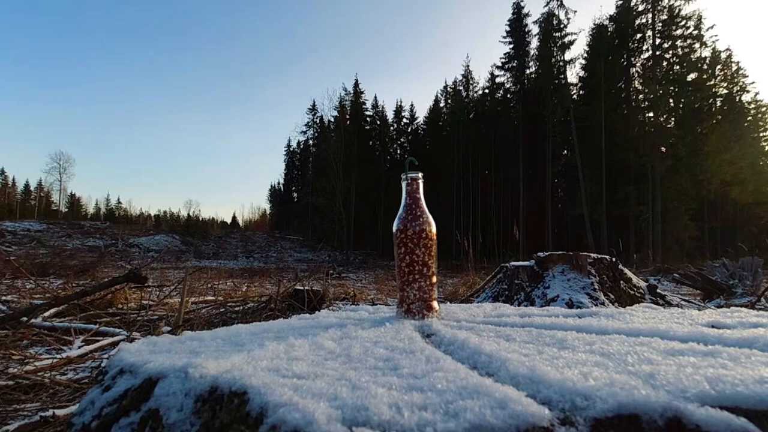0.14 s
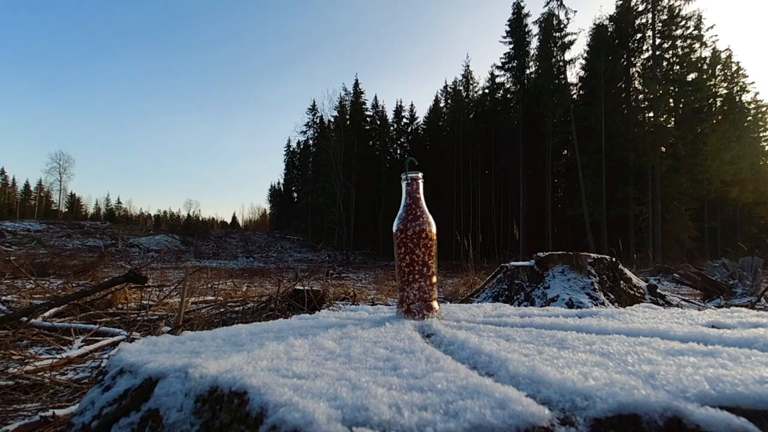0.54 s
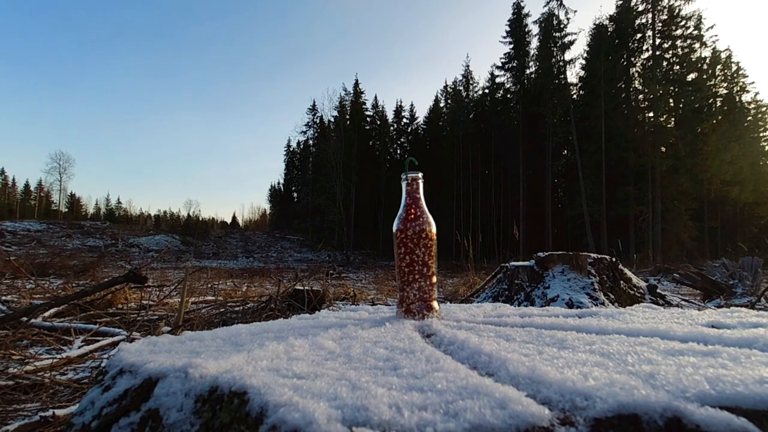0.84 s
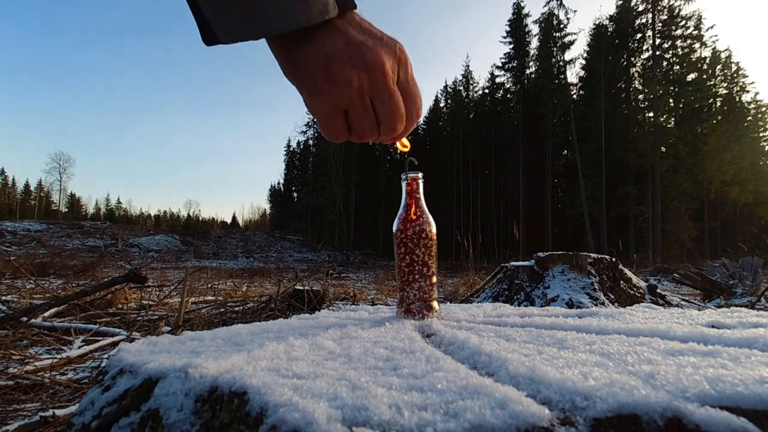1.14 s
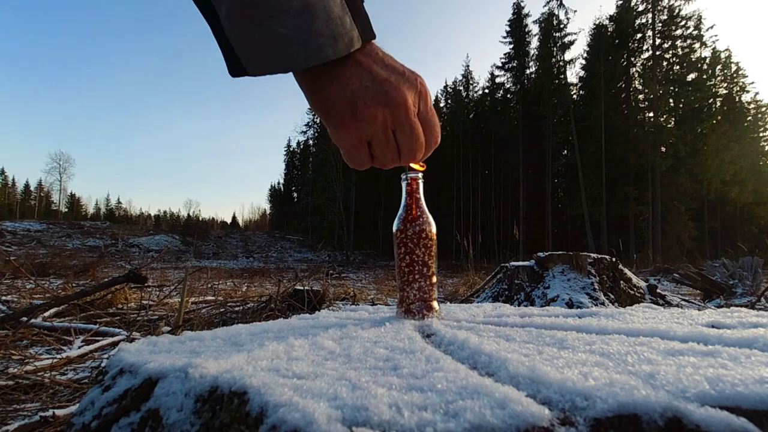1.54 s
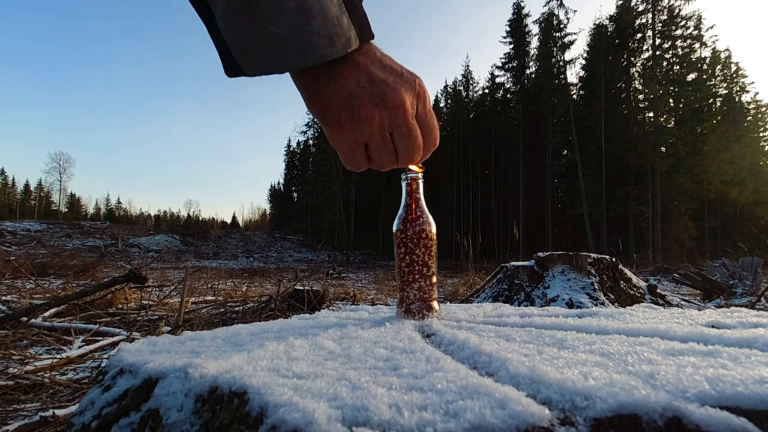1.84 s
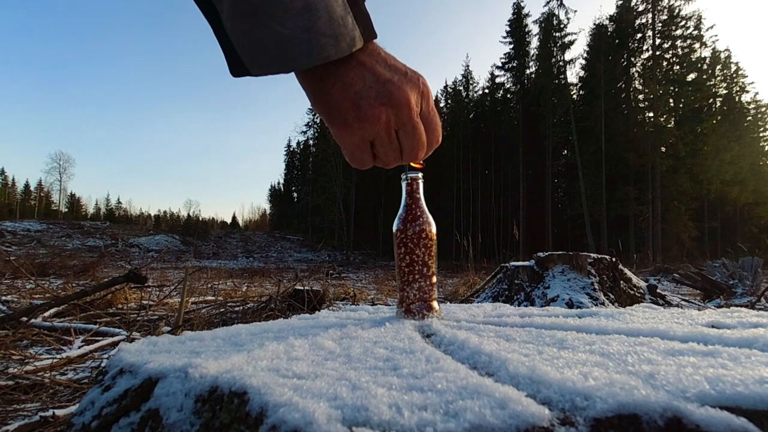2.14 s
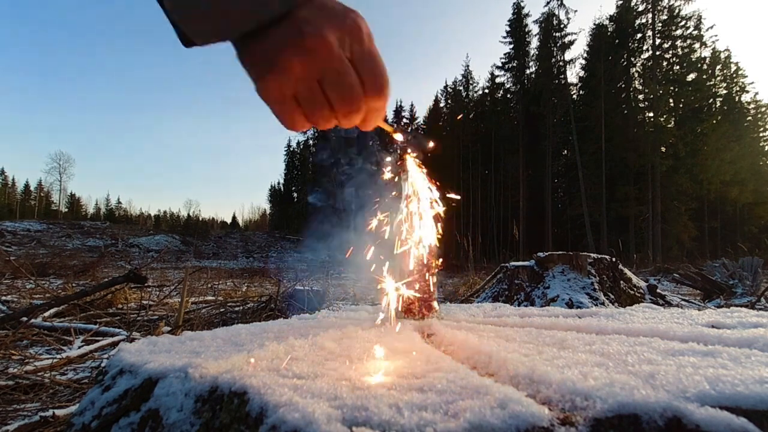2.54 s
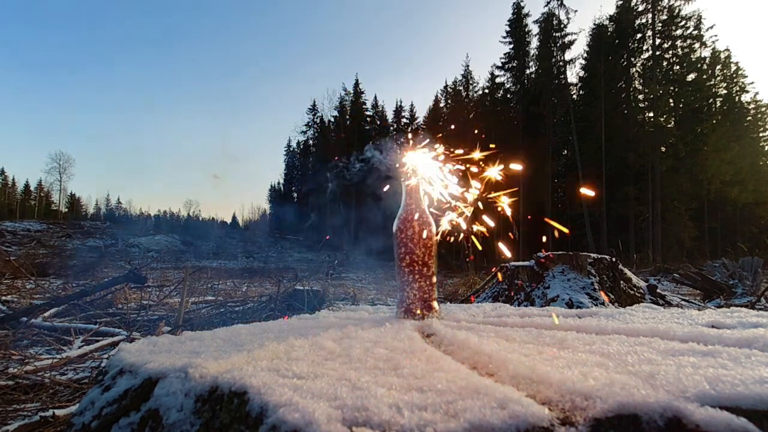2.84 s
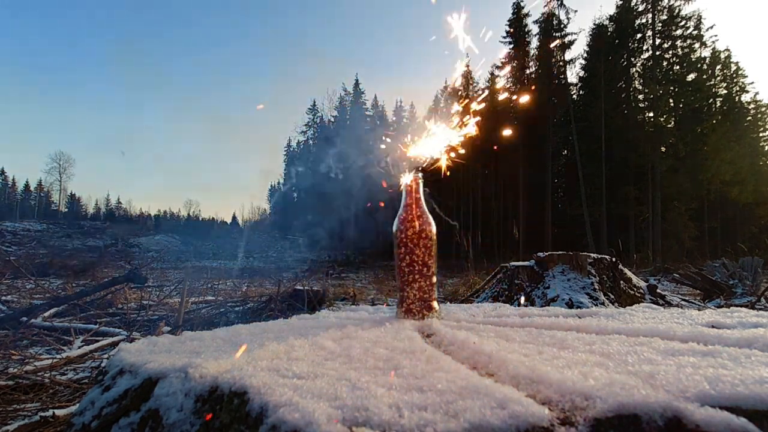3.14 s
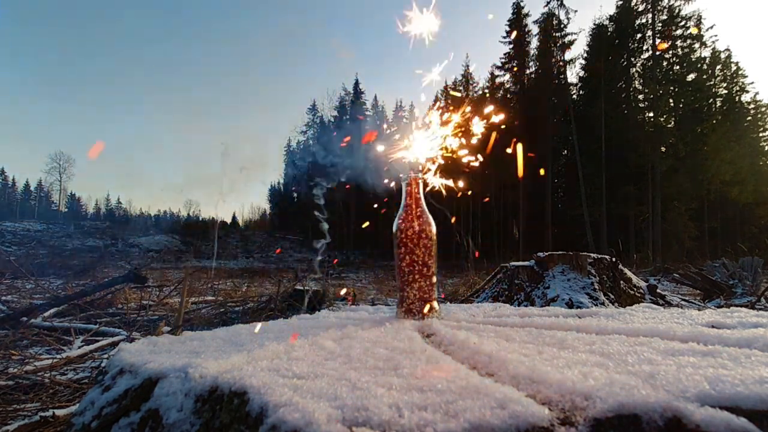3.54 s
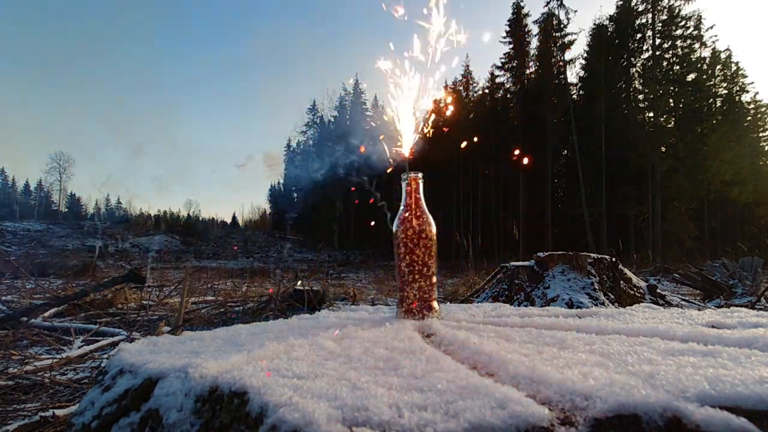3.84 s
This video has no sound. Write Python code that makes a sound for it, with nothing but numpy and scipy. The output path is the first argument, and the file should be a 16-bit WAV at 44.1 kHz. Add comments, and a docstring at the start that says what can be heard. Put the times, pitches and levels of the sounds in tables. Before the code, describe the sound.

Match heads ignite in a bottle with a loud roaring hiss. First, faint rustling at 0.2 s, a quick scratchy match strike near 0.35, then soft fizzing flame with snaps and pops, strongest around 0.9, fading by 1.2. Snow crunches on the right at 1.65; small pops near 2.0. From 2.35 the gas jet bursts out and roars to the end, crackling, with heavier pops at 3.1 and 3.8.

```python
"""Outdoors on a still winter day a match is struck, flares with small pops and is held to a glass bottle full of match heads.
Snow crunches once to the right, then the heads catch: gas roars and hisses out of the neck, thick with crackling sparks.
Scrape, flame, gas and air are coloured noise; pops are sinking tones, and sparks and the snow's crack are filtered clicks.
A soft drone from far away and a low rumble of air lie underneath, both made of steady noise."""
import sys
import numpy as np
from scipy import signal
from scipy.fft import rfft, irfft, next_fast_len
from scipy.io import wavfile
from scipy.ndimage import uniform_filter1d, map_coordinates

SR = 44100
rng = np.random.default_rng(int(sys.argv[2]) if len(sys.argv) > 2 else 0)


def dump(signal):
    """Clip the signal to [-1, 1] and save it as 16-bit WAV at the path in sys.argv[1]."""
    limited = np.clip(np.atleast_2d(signal).T, -1, 1)
    pcm = np.round(limited * 32767).astype(np.int16)
    wavfile.write(sys.argv[1], SR, pcm)


N = 176400  # samples: 4 s
TIME = np.arange(N) / SR
SIZE = 2 * next_fast_len(N // 2 + 4096)  # Fourier length, with room for filters to ring out
HZ = np.maximum(np.arange(SIZE // 2 + 1) * SR / SIZE, 1)

# loudness of the jet in four bands: time_s, roar_db, hiss_db, upper_hiss_db, sizzle_db
JET_LEVEL = [(2.28, -90, -90, -93, -100), (2.318, -61, -61, -66, -71.5), (2.332, -45, -44, -46, -48),
             (2.352, -45.5, -45.5, -45, -41), (2.372, -28.5, -30.5, -35, -30.5),
             (2.415, -27.5, -27, -32, -33), (2.45, -28, -29.5, -36, -34), (2.59, -30.5, -28.5, -34, -32.5),
             (2.648, -32, -26, -32.5, -24), (2.685, -30.5, -27.5, -34.5, -32),
             (2.775, -30, -27, -35.5, -32), (2.825, -32.5, -30, -37, -32.5), (2.87, -30.5, -27, -37, -34),
             (2.97, -30.5, -32, -43.5, -36.5), (3.06, -32, -32.5, -47, -36.5), (3.21, -29, -30.5, -43, -34),
             (3.3, -32, -33, -49, -37), (3.38, -31.5, -31.5, -43.5, -36), (3.56, -32.5, -30.5, -42, -35.5),
             (3.7, -33, -32.5, -47, -38), (3.91, -32, -31, -43, -37.5), (4.0, -34.5, -29, -39.5, -36.5)]
# part that differs between the two sides, for sounds straight ahead: pitch_hz, level_db
WIDTH_AHEAD = [(60, -20), (400, -21.5), (1200, -27), (2500, -25), (5000, -23), (6200, -29), (7800, -18),
               (15000, -14.5)]
# the same for sounds from the side: pitch_hz, level_db
WIDTH_ASIDE = [(60, -21.5), (400, -13), (1500, -10), (4000, -1), (9000, -2), (14000, -6.5)]


def from_db(db):
    """Decibels to gain."""
    return 10 ** (np.asarray(db) / 20)


def rms_one(x):
    """Scale to an average strength (rms) of 1."""
    return x / np.sqrt(np.mean(x ** 2) + 1e-20)


def gains(rows):
    """One gain curve for each dB column; silent before the first row."""
    times, *columns = np.transpose(rows)
    return [from_db(np.interp(TIME, times, db)) * (TIME >= times[0]) for db in columns]


def passing(rows):
    """Gain curves of a sound that stops at its last row."""
    return [gain * (TIME <= rows[-1][0]) for gain in gains(rows)]


def at_hz(points):
    """A table over log frequency, read at every frequency of the Fourier transform."""
    hz, value = np.transpose(points)
    return np.interp(np.log(HZ), np.log(hz), value)


def filtered(x, response):
    """Apply a frequency response."""
    return irfft(rfft(x, SIZE) * response, SIZE)[..., :N]


def low_pass(hz):
    """Response that keeps what lies below a frequency."""
    return 1 / (1 + (HZ / hz) ** 6)


def colour(x, points):
    """Filter with the given spectrum that never sounds ahead of its input (minimum phase)."""
    cepstrum = irfft(np.log(from_db(at_hz(points))), SIZE)
    # fold the mirrored half forward in time
    cepstrum[1:SIZE // 2] *= 2
    cepstrum[SIZE // 2 + 1:] = 0
    return filtered(x, np.exp(rfft(cepstrum)))


def resonance(x, hz, width_hz):
    """Ring at one pitch (two-pole resonance) with gain 1 on top; a narrow one rings longer."""
    radius = np.exp(-np.pi * width_hz / SR)
    top = np.array([1, 0, -1]) * (1 - radius ** 2) / 2
    bottom = [1, -2 * radius * np.cos(2 * np.pi * hz / SR), radius ** 2]
    return signal.lfilter(top, bottom, x + 1e-18)


def drift(rate_hz):
    """Slow random wandering with spread 1."""
    return rms_one(filtered(rng.standard_normal(N), 1 / (1 + (HZ / rate_hz) ** 2)))


def clicks(per_s, spread_db):
    """Clicks at random moments; a larger spread makes a few stand out more."""
    sizes = from_db(spread_db * np.minimum(rng.exponential(1, N), 4.5))
    happens = rng.random(N) < per_s / SR
    return sizes * rng.choice([-1, 1], N) * happens


def widen(mid, width):
    """Trade some of the shared sound for a part that is unlike on the two sides."""
    side = from_db(at_hz(width))
    unlike = filtered(rng.standard_normal(N), side) * np.array([[1], [-1]])
    return filtered(mid + unlike, 1 / np.sqrt(1 + side ** 2))


def grainy(per_s, spread_db, share, width):
    """Stereo raw noise: dense clicks (their share of the power) mixed with smooth turbulence."""
    grains = rms_one(clicks(per_s, spread_db))
    mid = np.sqrt(share) * grains + np.sqrt(1 - share) * rng.standard_normal(N)
    return widen(mid, width)


def bursts(rows):
    """Envelope of short bursts; rise and fall are the times for 20 dB."""
    power = 0
    for peak_s, db, rise_s, fall_s in rows:
        distance = np.maximum((peak_s - TIME) / rise_s, (TIME - peak_s) / fall_s)
        power = power + from_db(db - 20 * np.minimum(distance, 10)) ** 2
    return np.sqrt(power)


def flicker(x, depth_db, size, patch_size):
    """Random gains, smoothed over neighbouring bins, make narrow bands swell and sink."""
    spectra = signal.stft(x, nperseg=size)[2]
    chance = rng.standard_normal(spectra.shape[1:])
    patches = rms_one(uniform_filter1d(chance, size=patch_size, axis=0))
    return signal.istft(spectra * from_db(depth_db * patches), nperseg=size)[1][:, :N]


def from_side(x, lead_ms):
    """Sound from one side reaches the nearer ear first; a positive lead means the left."""
    shift = lead_ms / 1000 * SR / 2  # samples: half the lead on each side
    left, right = x
    moved = [(left, np.arange(N) + shift), (right, np.arange(N) - shift)]
    return np.array([map_coordinates(side, [places], order=3) for side, places in moved])


def rustle():
    """Sleeve and box rustle before the strike: grainy noise that comes and goes."""
    # loudness: time_s, level_db
    rustle_level = [(.15, -99), (.165, -63), (.19, -49.5), (.225, -44.5), (.28, -55), (.33, -52.5),
                    (.36, -88.5)]
    # spectrum: pitch_hz, level_db
    rustle_colour = [(80, -51.5), (184, 0.5), (227, -0.5), (291, -12.5), (660, -6), (814, -23),
                     (1070, -12.5), (1770, -20), (9660, -21), (15000, -26.5)]
    rubbing = grainy(4300, spread_db=7.5, share=0.27, width=WIDTH_ASIDE)
    return passing(rustle_level)[0] * rms_one(colour(rubbing, rustle_colour))


def strike():
    """The head grates over the striker in quick slips, brighter when pressed harder, and the box rings on."""
    # slips of the match head over the box: peak_s, level_db, rise_s, fall_s
    slips = [(.3315, -35, .007, 0.098), (.346, -26.5, .008, .01), (.355, -17.5, 0.012, 0.018),
             (.3605, -19, 0.008, 0.0073), (.3635, -22.5, .002, 0.013), (.3762, -17.5, .004, 0.0066),
             (.382, -29, .008, 0.013)]
    # spectrum of the scrape: pitch_hz, level_db
    scrape_colour = [(70, -38.5), (190, -20.5), (320, -17.5), (450, -15), (850, -15.5), (1060, -12.5),
                     (1350, -22), (1530, -8.5), (1850, -24), (2200, -9), (2420, -17.5), (2650, -10.5),
                     (3450, -12.5), (4000, -24), (5200, -24), (7000, -32.5), (8400, -14), (9400, -9.5),
                     (10500, -20.5), (15500, -35.5)]
    treble_from_hz, treble_extra_exponent = 5006, 0.69  # treble grows faster than pressure
    box_hz, box_width_hz, box_db = 1069, 90, -7  # level relative to the raw grating

    grit = grainy(7000, spread_db=0.2, share=0.32, width=WIDTH_ASIDE)
    scrape = rms_one(colour(grit, scrape_colour))
    body = filtered(scrape, low_pass(treble_from_hz))
    treble = scrape - body
    pressure = bursts(slips)
    brightness = (pressure / pressure.max()) ** treble_extra_exponent

    grating = pressure * grit
    ring = rms_one(resonance(grating, box_hz, box_width_hz))
    box = from_db(box_db) * np.std(grating) * ring
    return box + pressure * (body + treble * brightness)


def air():
    """Far drone and low rumble of the open air: wide, softly wavering noise."""
    # spectrum: pitch_hz, level_db
    air_colour = [(20, -4), (70, 1.5), (130, -2), (220, -7), (330, -4.5), (500, -8), (680, -3.5), (860, -1),
                  (1100, -8), (1500, -13.5), (2200, -18.5), (3300, -20.5), (5000, -27), (8000, -38),
                  (14000, -64)]
    # part that differs between the two sides: pitch_hz, level_db
    air_width = [(40, -12), (200, -10), (800, -11.5), (2000, 4.5), (14000, -7.5)]
    level_db, waver_db, start_s, fade_s = -55, 0.71, 0.154, 0.068
    fade = np.clip((TIME - start_s) / fade_s, 0, 1)
    noise = widen(rng.standard_normal(N), air_width)
    return fade * from_db(level_db + waver_db * drift(6.7)) * rms_one(colour(noise, air_colour))


def snaps():
    """Short dry snaps, one before the strike and the rest after it: ringing noise that dies away at once."""
    # single sharp snaps: start_s, level_db, centre_hz
    snap_rows = [(0.2546, -43.5, 4360), (0.4756, -40, 2230), (0.887, -33, 2940), (0.922, -24.5, 9000)]
    t60_s, width_share = 0.025, 0.7  # time to fall 60 dB; width as a share of the centre
    white, out = rng.standard_normal(N), np.zeros(N)
    for start_s, db, hz in snap_rows:
        age = np.clip((TIME - start_s) / t60_s, 0, 2)
        fall = (TIME >= start_s) * np.exp(-np.log(1000) * age)
        out += from_db(db) * fall * rms_one(resonance(white, hz, hz * width_share))
    return out


def pops():
    """Each pop is a pressure swing of two or three cycles that sags in pitch and trails dull turbulence."""
    # low pops before the strike, in the flame and during the jet: start_s, level_db, starting_pitch_hz
    pop_rows = [(0.2884, -27, 397), (0.44, -31, 660), (0.49, -36, 430), (0.505, -37, 318),
                (0.62, -40.5, 444), (0.8607, -22.5, 1230), (0.9219, -16.5, 485), (1.02, -29.5, 525),
                (1.042, -24, 483), (1.431, -42.5, 343), (1.586, -46, 600), (1.967, -30, 413),
                (2.097, -41, 410), (3.1165, -24, 413), (3.7931, -20, 310), (3.8166, -18, 1200),
                (3.8177, -19.5, 266)]
    cycles_to_peak, sag = 0.61, 0.21  # sag: natural log of the pitch lost per cycle
    grit_db, grit_top_hz, grit_fall_s = -22.5, 890, 0.024
    grit = rms_one(filtered(rng.standard_normal(N), low_pass(grit_top_hz)))
    out = np.zeros(N)
    for start_s, db, hz in pop_rows:
        since = np.clip(TIME - start_s, 0, 1)
        cycles = np.log1p(sag * hz * since) / sag
        age = cycles / cycles_to_peak
        swing = age ** 2 * np.exp(2 * (1 - age)) * np.sin(2 * np.pi * cycles)
        trail = grit * np.minimum(age, 1) * np.exp(-since / grit_fall_s)
        out += from_db(db) * (swing + from_db(grit_db) * trail)
    return out


def flare():
    """The match head burns off: a bright fizz swells and sinks over a soft, fluttering flame and fades first."""
    # loudness: time_s, flame_db, fizz_db
    flare_level = [(.35, -71, -73), (.39, -48.5, -43), (.48, -44.5, -44.5), (.53, -54.5, -48),
                   (.585, -50, -43.5), (.69, -46.5, -51), (.755, -45.5, -45), (.8, -42.5, -55),
                   (.865, -43, -41), (.905, -42.5, -49), (1.0, -45, -50.5), (1.09, -48, -59.5),
                   (1.17, -60, -74), (1.26, -67, -99)]
    # spectrum of the flame: pitch_hz, level_db
    flame_colour = [(60, -7.5), (130, -3.5), (400, -4), (1300, -5.5), (2400, -11), (3400, -7), (5000, -16),
                    (8000, -19.5), (15000, -64.5)]
    # spectrum of the fizz: pitch_hz, level_db
    fizz_colour = [(3000, -21), (6500, -5.5), (7600, -6), (9200, 1), (11000, -1.5), (13000, -3),
                   (14200, -12), (15500, -19)]
    flame_level, fizz_level = passing(flare_level)
    burn = grainy(9000, spread_db=-0.5, share=0.23, width=WIDTH_ASIDE)
    burn = flicker(burn, depth_db=5.5, size=2048, patch_size=14)
    flutter = from_db(1.4 * drift(10))
    flame = flame_level * flutter * rms_one(colour(burn, flame_colour))
    return flame + fizz_level * rms_one(colour(burn, fizz_colour))


def thuds():
    """Soft low pushes of air from the match flame, the crunch and the jet: bursts of deep noise."""
    # pushes of air: peak_s, level_db, rise_s, fall_s
    puffs = [(.8, -49.5, 0.16, 0.6), (1.652, -34, 0.0064, 0.011), (1.665, -36, 0.016, 0.024),
             (3.25, -45, 0.11, 0.078), (3.76, -33.5, 0.05, 0.081), (3.81, -32, 0.05, 0.027)]
    # spectrum: pitch_hz, level_db
    puff_colour = [(25, -10), (75, 2), (300, -16.5), (2000, -64.5)]
    noise = widen(rng.standard_normal(N), WIDTH_AHEAD)
    return bursts(puffs) * rms_one(colour(noise, puff_colour))


def crunch():
    """Crusted snow breaks with one sharp crack, and grainy crumbling surrounds it."""
    # bursts of crumbling: peak_s, level_db, rise_s, fall_s
    crumblings = [(1.644, -40, 0.01, 0.0034), (1.6502, -34.5, 0.013, 0.011), (1.6585, -45.5, 0.0019, 0.034)]
    # spectrum of crack and crumbs: pitch_hz, level_db
    snow_colour = [(500, 1), (1200, -7), (1850, 3.5), (3000, -1), (4400, 7), (5400, 1), (6500, -14),
                   (8700, -5), (9700, -14), (11000, -55)]
    break_s, crack_peak_db = 1.6442, -27  # the crust gives way
    crack = colour(signal.unit_impulse(N, int(break_s * SR)), snow_colour)
    crack = from_db(crack_peak_db) * crack / np.abs(crack).max()
    crumbs = grainy(3400, spread_db=2.5, share=0.5, width=WIDTH_ASIDE)
    return crack + bursts(crumblings) * rms_one(colour(crumbs, snow_colour))


def jet():
    """Turbulent gas and countless tiny bursts ring the neck; four bands waver, partly together."""
    # borders between roar, hiss, upper hiss and sizzle: pitch_hz
    edges_hz = [10, 1600, 4000, 8000, 17000]
    # spectrum within the bands: pitch_hz, level_db
    jet_colour = [(25, -33), (60, -4.5), (100, -4.5), (150, -4.5), (300, 0), (600, 1), (950, -2.5),
                  (1200, -3), (1800, 0), (2600, 1.5), (3300, 1.5), (4200, -2), (5500, -5.5), (6400, -8),
                  (7200, -14.5), (7900, -12), (8900, -4), (10600, -5.5), (12200, -10.5), (15500, -10)]
    # resonances of the bottle neck, over the jet noise at the hardest hiss: pitch_hz, width_hz, level_db
    neck_rows = [(640, 38, -10), (1156, 150, -5.5), (2470, 90, -9), (3230, 63, -3), (5420, 260, -6),
                 (10440, 410, -6)]
    neck_follows = 0.33  # exponent: the neck rings more as the jet hisses harder
    flutter_hz, shared_flutter_db, own_flutter_db = 14, 0.44, 0.253

    levels = gains(JET_LEVEL)
    hiss = levels[1]
    burn = grainy(8000, spread_db=2.4, share=0.55, width=WIDTH_AHEAD)
    neck = sum(from_db(db) * resonance(burn, hz, width_hz) for hz, width_hz, db in neck_rows)
    neck = neck * (hiss / hiss.max() + 1e-9) ** neck_follows
    gas = colour(flicker(burn + neck, depth_db=2.3, size=1024, patch_size=2), jet_colour)

    surge, out = drift(flutter_hz), 0
    for level, low_hz, high_hz in zip(levels, edges_hz, edges_hz[1:]):
        band = 1 / (1 + (HZ / high_hz) ** 12) - 1 / (1 + (HZ / low_hz) ** 12)
        flutter_db = shared_flutter_db * surge + own_flutter_db * drift(flutter_hz)
        out = out + level * rms_one(filtered(gas, band)) * from_db(flutter_db)
    return out


def sparks():
    """Small bursting sparks crackle for as long as the jet roars; a few large ones crack above them."""
    # the loudest sparks burst apart from the crackle: start_s, size_db
    large_sparks = [(2.6855, -18), (2.7325, -17), (2.754, -19), (3.0708, -8), (3.3467, -17), (3.5757, -5),
                    (3.6285, -12.5), (3.8, -21)]
    # spectrum of a spark: pitch_hz, level_db
    spark_colour = [(200, -20), (1000, 3), (3200, 1), (5000, -9), (7200, -11), (9500, 2), (15500, -1)]
    roar = gains(JET_LEVEL)[0]
    # the smallest clicks are 4 dB over the roar's gain
    cracks = from_db(4) * roar * clicks(110, spread_db=1.6)
    for start_s, db in large_sparks:
        cracks[int(start_s * SR)] -= from_db(db)
    # each side hears every spark at a slightly different strength
    uneven = from_db(rng.standard_normal((2, N)))
    return colour(cracks * uneven, spark_colour)


def scene():
    """The match comes in from the left, the snow crunches on the right, the bottle stands straight ahead."""
    # how far the left side leads as the match moves in: time_s, lead_ms
    match_lead = [(.2, 0.19), (.6, 0.084), (.9, 0.058), (1.1, 0.007)]
    lead_ms = np.interp(TIME, *np.transpose(match_lead))
    match = from_side(rustle() + strike() + snaps() + pops() + flare(), lead_ms)
    snow = from_side(crunch(), lead_ms=-0.13)
    return match + air() + thuds() + snow + jet() + sparks()


def record(dry):
    """The top is cut steeply above 15750 Hz."""
    return filtered(dry, 1 / np.sqrt(1 + (HZ / 15750) ** 1000))


dry = scene()
out = record(dry)
dump(out)
```